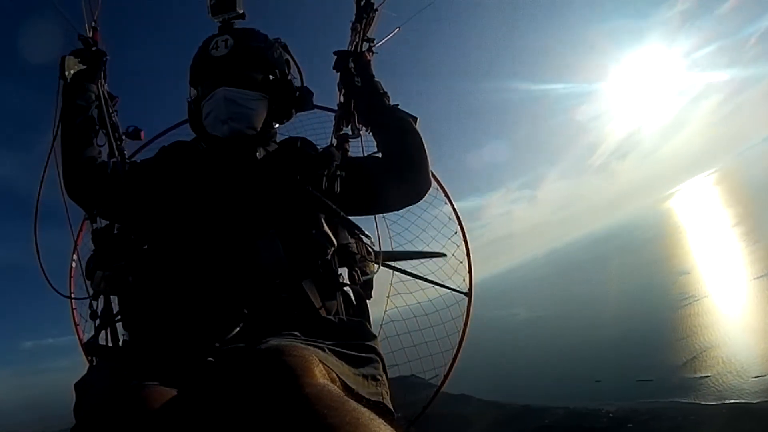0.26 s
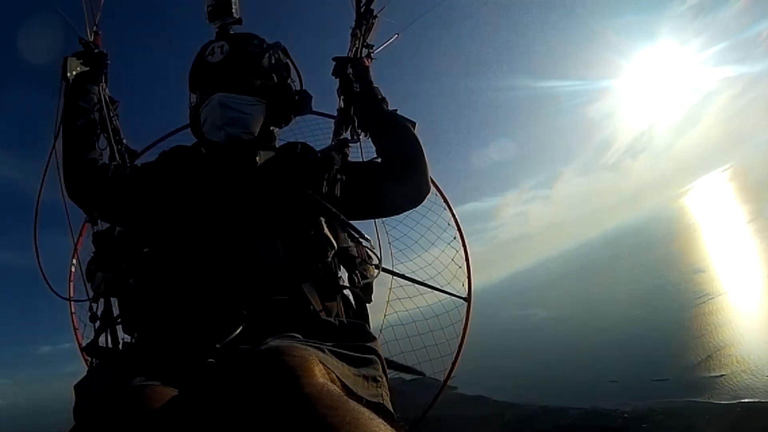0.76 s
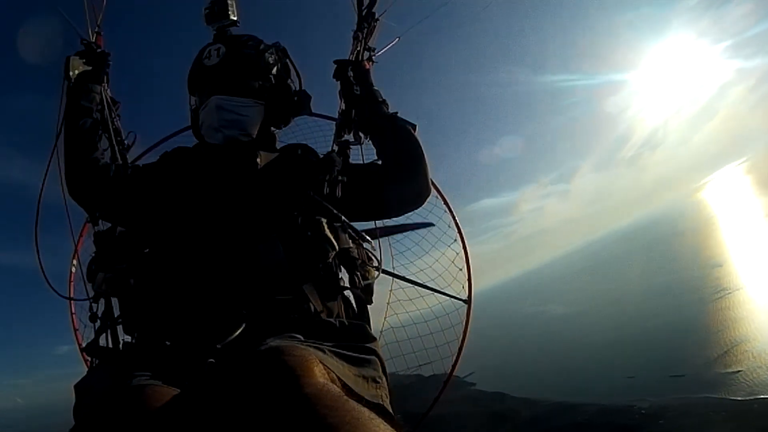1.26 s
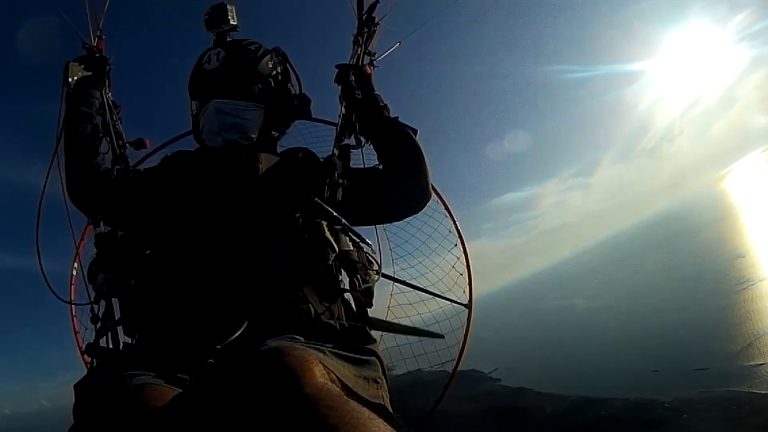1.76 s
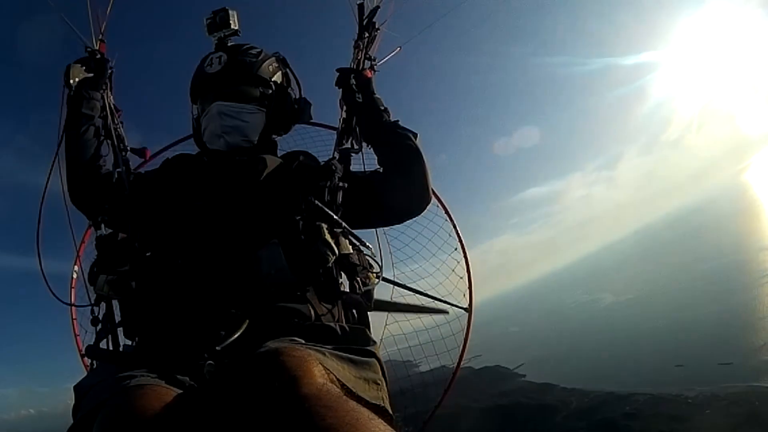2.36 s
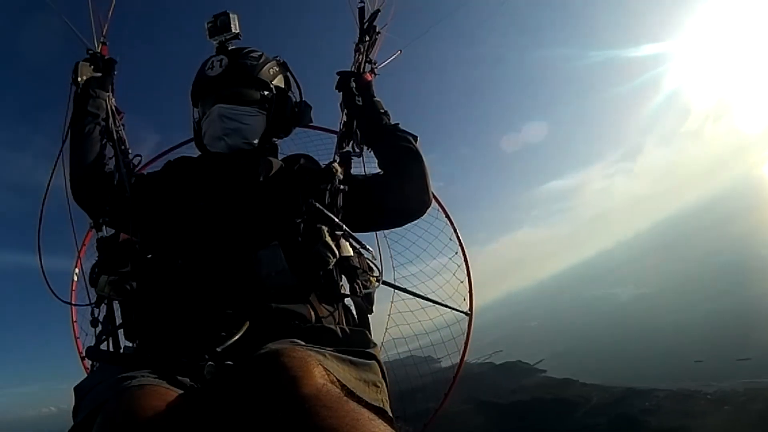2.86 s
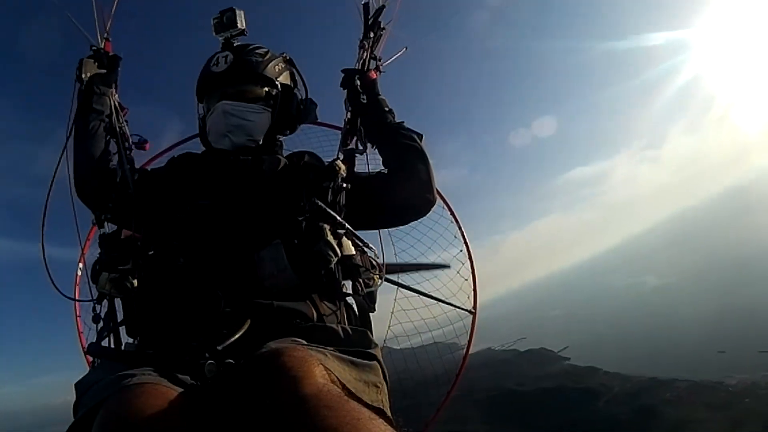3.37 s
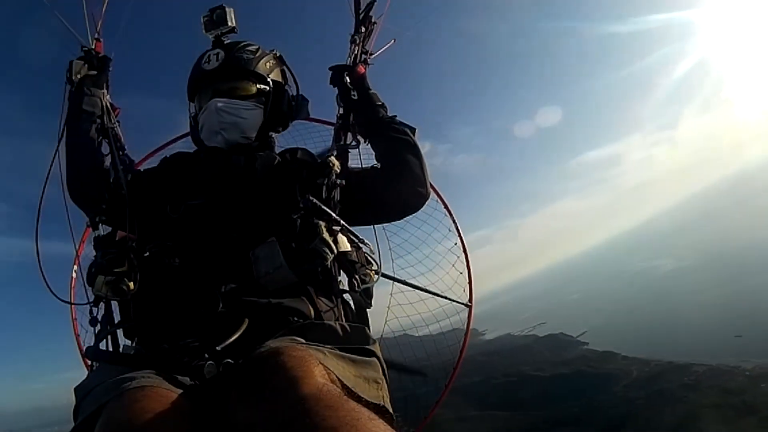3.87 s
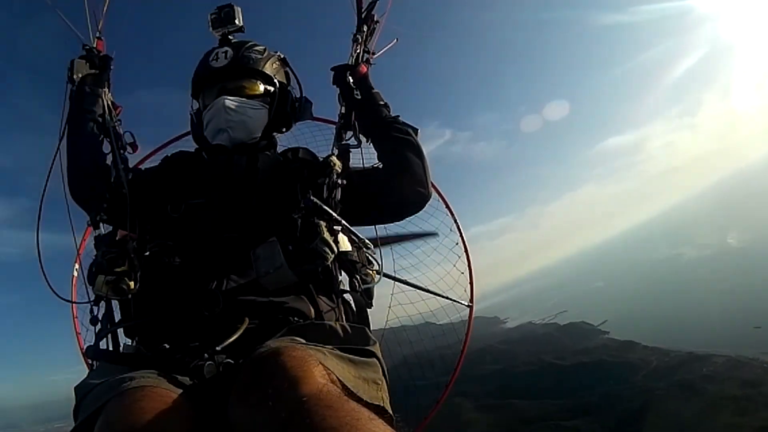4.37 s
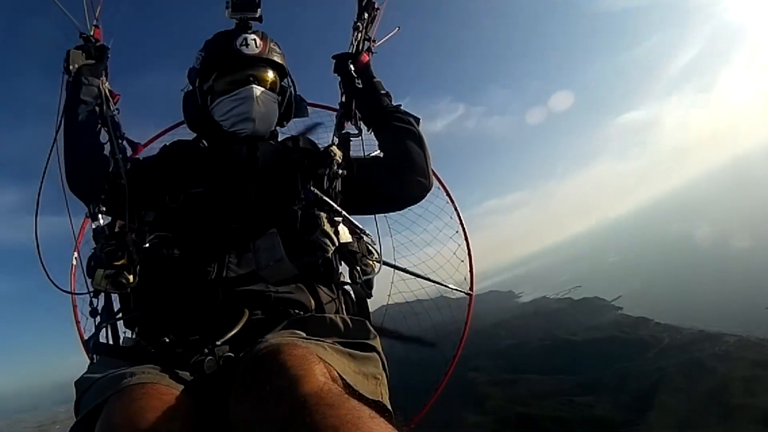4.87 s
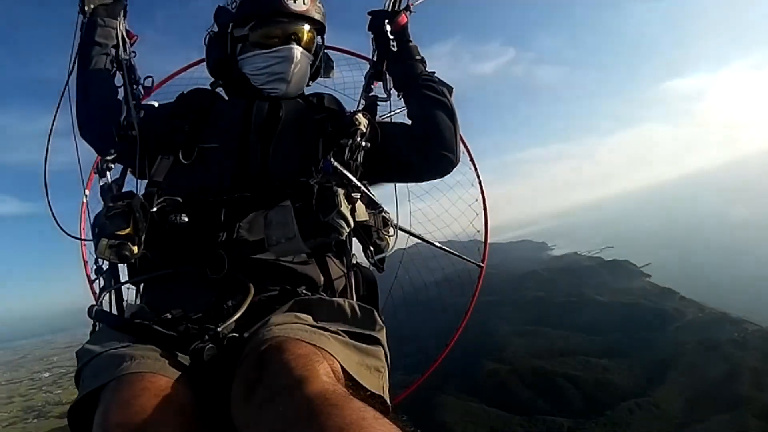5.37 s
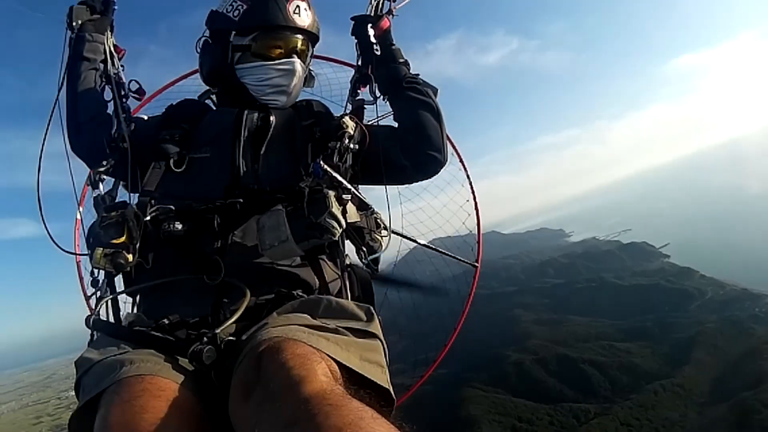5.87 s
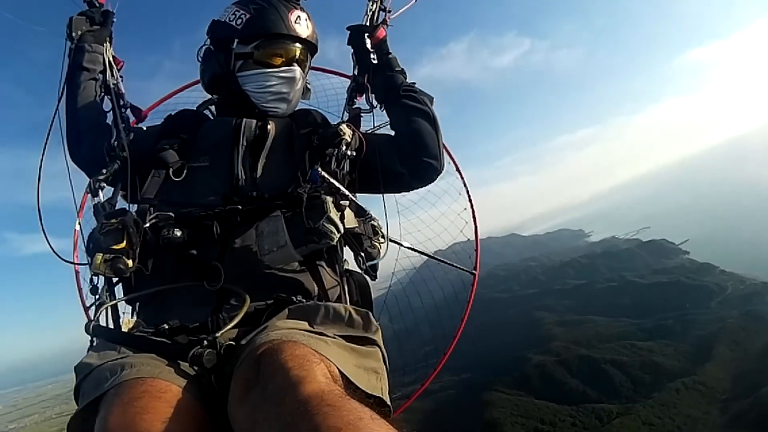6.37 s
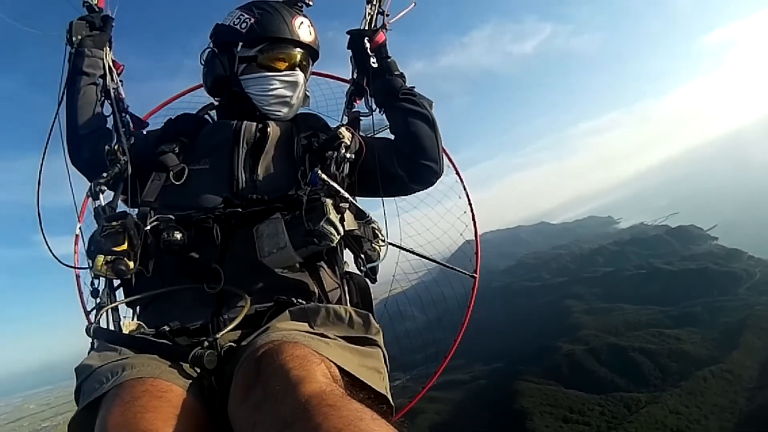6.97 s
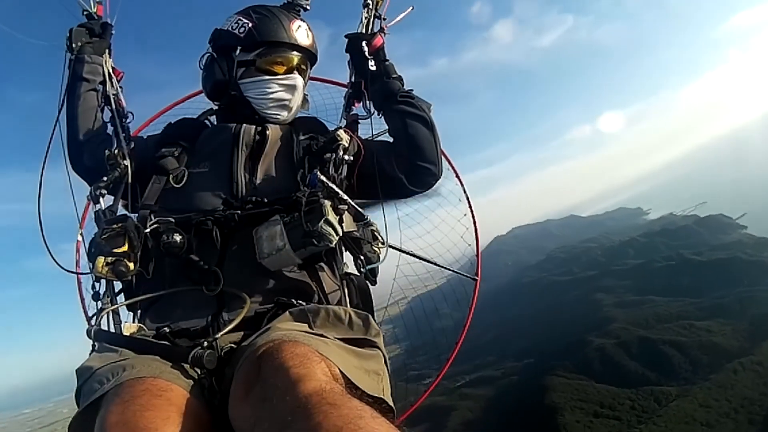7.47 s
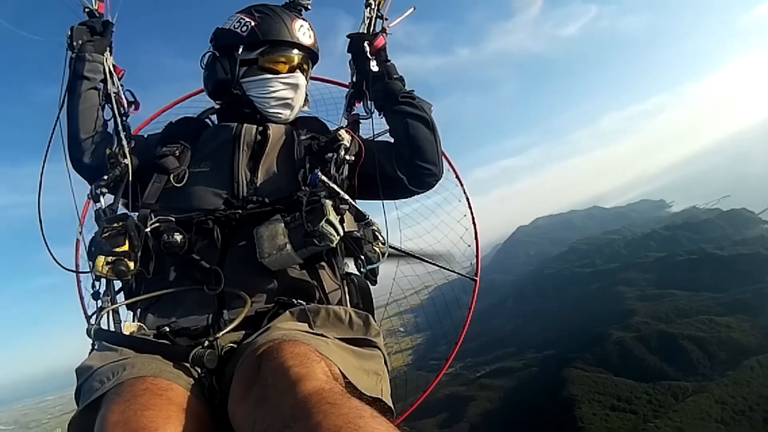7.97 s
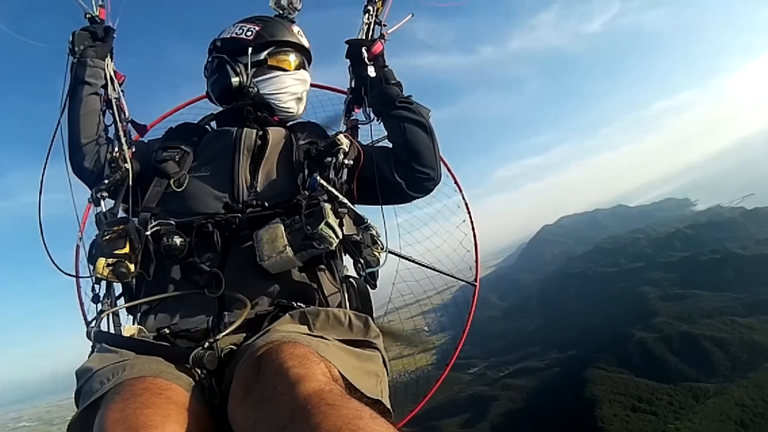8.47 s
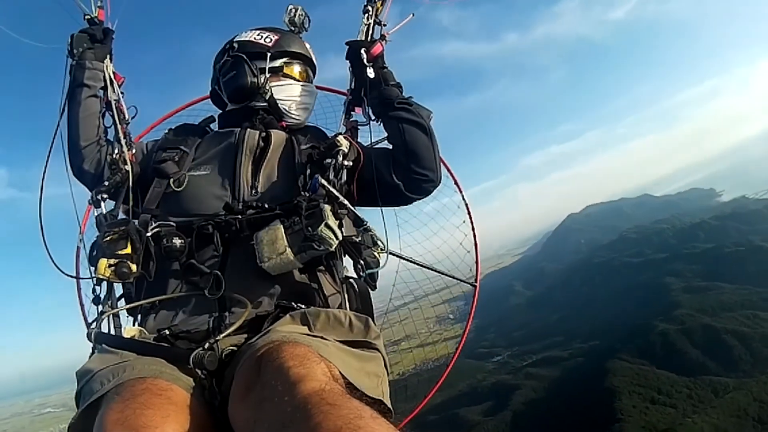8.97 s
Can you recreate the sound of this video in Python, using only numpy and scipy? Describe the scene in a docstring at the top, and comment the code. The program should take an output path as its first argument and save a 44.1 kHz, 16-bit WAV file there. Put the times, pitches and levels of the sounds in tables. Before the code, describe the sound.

A paramotor's small two-stroke engine and propeller drone at one steady pitch, a rough buzzing snarl with fast bright blade swish and soft low wind.

```python
"""Paramotor in cruise

Steady throttle, heard just in front of the pilot; wind and exhaust level wander slightly.
Propeller and two-stroke exhaust are two harmonic stacks, geared together, that beat against each other.
Blades chop the exhaust into sum and difference tones; slaps and noise bursts ring the cage as a swish.
Shaped noise makes propeller wash, hiss and light wind; a faint metal ring and electronic whine lie on top.
"""
import sys
import numpy as np
from scipy import signal
from scipy.fft import rfft, irfft, next_fast_len
from scipy.io import wavfile
from scipy.ndimage import uniform_filter1d

SR = 44100
rng = np.random.default_rng(int(sys.argv[2]) if len(sys.argv) > 2 else 0)


def generate_wav(signal):
    """Clip the signal to [-1, 1] and save it as 16-bit WAV at the path in sys.argv[1]."""
    frames = np.transpose(np.atleast_2d(signal))
    scaled = np.clip(frames, -1, 1) * 32767
    pcm = np.round(scaled).astype(np.int16)
    wavfile.write(sys.argv[1], SR, pcm)


N = 406161

# Engine speed drift: (time [s], blade passes per second [Hz])
BLADE_RATE = [(0.0, 65.039), (0.8, 64.966), (1.4, 65.222), (2.4, 65.15), (2.8, 65.237), (4.4, 65.173),
              (5.0, 65.119), (6.0, 65.105), (7.0, 65.113), (7.4, 65.431), (7.8, 65.403), (8.6, 65.528),
              (9.2, 65.233)]
# Propeller harmonics: (multiple of blade rate, nominal rms level [dB])
BLADE_TONES = [(1, -47.6), (2, -46.5), (3, -43.9), (4, -53.5), (5, -45.5), (6, -53.6), (7, -48.4),
               (8, -55.5), (9, -41.7), (10, -45.7), (11, -47.0), (12, -49.8), (13, -44.5), (14, -43.4),
               (15, -42.9), (16, -55.8), (17, -46.8), (18, -42.8), (19, -43.2), (20, -49.6), (21, -44.3),
               (22, -39.8), (23, -35.8), (24, -41.7), (25, -47.6), (26, -42.3), (27, -50.5), (28, -49.8),
               (29, -45.8), (30, -53.7)]
# Exhaust harmonics: (multiple of firing rate, nominal rms level [dB])
EXHAUST_TONES = [(1, -44.1), (2, -52.9), (3, -46.1), (4, -53.1), (5, -42.9), (6, -62.4), (7, -53.4),
                 (8, -58.0), (9, -52.1), (10, -51.5), (11, -41.4), (12, -37.5), (13, -39.4), (14, -52.5),
                 (15, -46.8), (16, -46.0)]
# Blade-chopped exhaust: (multiple of firing rate, added multiple of blade rate, nominal rms level [dB])
CHOPPED_TONES = [(1, 2, -46.4), (1, 3, -47.7), (2, 1, -40.2), (2, 2, -48.6), (3, -1, -52.0), (4, 1, -47.9),
                 (4, 3, -50.2), (5, 1, -46.7), (5, -1, -52.8), (8, 1, -51.4), (11, 2, -51.0),
                 (12, 1, -50.4), (13, -1, -49.1)]
# Pilot turning; the scene removes the mean: (time [s], turn [0-1])
PILOT_TURN = [(0, .25), (1.2, 0.3), (2.3, 0), (4, 0.1), (5.3, 0.2), (5.9, 1), (6.9, 0.64), (7.6, 0.72),
              (9.2, 0.3)]
# Shading of the harmonics per unit turn: (centre [Hz], Gaussian width [Hz], change [dB])
SHADING = [(65, 25, -6), (195, 30, -2), (326, 15, -7), (940, 240, 3.5), (1174, 30, 1.5), (1540, 30, -2),
           (1923, 120, 11.5)]
# Wind swell, before a common offset: (time [s], relative level [dB])
WIND_SWELL = [(0, -39.5), (2, -39.5), (3.5, -37), (5.3, -38), (6.3, -45), (8, -41), (9.2, -44)]
# Cage and housing resonances: (centre [Hz], width [Hz], relative peak [dB])
CAGE_MODES = [(1533, 149, 2), (1720, 96, -5), (1904, 205, -6.5), (2230, 92, -8), (2412, 78, -13),
              (2890, 205, -21), (3075, 103, -15.5), (3610, 117, -26), (3863, 156, -24), (4037, 154, -25.5),
              (4490, 93, -31), (4970, 350, -39)]
# Propeller wash spectrum: (frequency [Hz], relative density [dB per Hz])
WASH_SPECTRUM = [(40, -29), (110, -12.5), (230, -7.5), (450, -6), (620, -3.5), (780, -5), (1000, -3),
                 (1300, -2), (2000, -20), (2600, -18), (3300, -27), (5500, -39), (9000, -63)]
# Air hiss spectrum: (frequency [Hz], relative density [dB per Hz])
HISS_SPECTRUM = [(2500, -12), (5500, 1), (7000, 1), (7700, 2.5), (9500, -4.5), (10800, 0), (12400, -8.5),
                 (14300, -4), (15500, -11.5)]
# Camera electronics whine: (frequency [Hz], rms level [dB])
WHINE_TONES = [(11859, -86), (11908, -90), (11951, -80.5)]
# Reflections off pilot, harness and cage: (propeller delay [ms], exhaust delay [ms], gain [ratio])
ECHOES = [(4.64, 2.59, .9), (8.26, 4.78, .8), (9.85, 6.03, .7)]

CRANK_TURNS_PER_PROP_TURN = 73 / 19
TOP_HZ = 15600
TIME_S = np.arange(N) / SR


def undb(db):
    """Decibels to amplitude gain."""
    return 10 ** (np.asarray(db) / 20)


def level(x, rms_db):
    """Scale a sound to an rms level."""
    return x * undb(rms_db) / np.sqrt(np.mean(x ** 2))


def curve(rows):
    """Join (time, value) rows by straight lines."""
    times_s, values = np.transpose(rows)
    return np.interp(TIME_S, times_s, values)


def walk(rate_hz):
    """Random values at rate_hz, slewed from one to the next; rms 1."""
    hold = max(int(SR / rate_hz), 1)
    steps = np.repeat(rng.standard_normal(N // hold + 1), hold)
    return level(uniform_filter1d(steps, hold)[:N], 0)


def noise(points):
    """Noise of rms 1, coloured by (Hz, dB) points joined over log frequency."""
    hz, db = np.transpose(points)
    bins_hz = np.maximum(np.arange(N // 2 + 1) * SR / N, 1)
    gain = undb(np.interp(np.log(bins_hz), np.log(hz), db))
    return level(irfft(rfft(rng.standard_normal(N)) * gain, N), 0)


def resonate(x, modes):
    """Causal ringing through steep (Hz, width Hz, dB) resonances: the tail follows the blow."""
    size = next_fast_len(N + SR // 10)
    bins_hz = np.abs(np.fft.fftfreq(size, 1 / SR))
    power = sum(undb(db) ** 2 / (1 + ((bins_hz - hz) / width_hz) ** 2) ** 3
                for hz, width_hz, db in modes)
    log_gain = np.log(power + 1e-9) / 2
    response = np.exp(np.conj(signal.hilbert(log_gain)))  # minimum phase
    return irfft(rfft(x, size) * response[:size // 2 + 1], size)[:N]


def clicks(cycles):
    """One click per cycle, shared between neighbouring samples; rms 1."""
    distance = np.abs((cycles + .5) % 1 - .5)
    return level(np.maximum(1 - distance / np.gradient(cycles), 0), 0)


def smear(x, delay_ms, share):
    """All-pass echo: spreads a click in time, keeps its colour."""
    taps = np.r_[share, np.zeros(int(delay_ms * SR / 1000)), 1]
    return signal.lfilter(taps, taps[::-1], x)


def tone(cycles, rms_db):
    """Pure tone of a given rms level."""
    return np.sqrt(2) * undb(rms_db) * np.cos(2 * np.pi * cycles)


def stack(cycles, rate_hz, tones, echoes, turn, waver_db):
    """Pulse harmonics, phase-smeared by near reflections, shaded by turn, wavering in moving air."""
    out = 0
    for order, db in tones:
        hz = order * rate_hz
        paths = 1 + sum(gain * np.exp(-2j * np.pi * hz * ms / 1000) for ms, gain in echoes)
        echo_cycles = np.angle(paths) / (2 * np.pi)  # phase only; the table sets the level
        shade_db = sum(change_db * np.exp(-((hz - centre_hz) / width_hz) ** 2)
                       for centre_hz, width_hz, change_db in SHADING)
        tone_db = db + shade_db * turn + waver_db * walk(3)
        out = out + tone(order * cycles + echo_cycles, tone_db)
    return out


def exhaust(firings, blades, rate_hz, turn, waver_db=1.34, scatter_db=1.26):
    """Uneven firing pulses; blades sweeping the outlet bend the note into sum and difference tones."""
    echoes = [(ms, gain) for _, ms, gain in ECHOES]
    note = stack(firings, rate_hz, EXHAUST_TONES, echoes, turn, waver_db)
    # moving air between outlet and blades
    drift_cycles = 0.41 + 0.11 * walk(4)
    # difference tones have opposite sign, as in pitch bending
    chopped = sum(np.sign(blade) * tone(fire * firings + blade * blades + drift_cycles, db)
                  for fire, blade, db in CHOPPED_TONES)
    return (note + chopped) * undb(scatter_db * walk(110))


def metal_ring(firings, centre_hz=14450, width_hz=300, rms_db=-80):
    """Each firing rings the engine's metal, faint and very high."""
    blows = clicks(firings) * undb(2.5 * walk(125))
    return level(resonate(blows, [(centre_hz, width_hz, 0)]), rms_db)


def propeller(blades, rate_hz, turn, waver_db=1.47, scatter_db=0.57):
    """Blade pressure pulses, their strength scattered by turbulent inflow."""
    echoes = [(ms, gain) for ms, _, gain in ECHOES]
    pulses = stack(blades, rate_hz, BLADE_TONES, echoes, turn, waver_db)
    return pulses * undb(scatter_db * walk(60))


def swish(blades, rms_db=-31.5, decay_passes=0.083, slap_gain=0.78, slap_hz=1950, slap_ms=.75,
          scatter_db=0.82):
    """A blade cuts the pilot's wake: a bright slap and a turbulence burst ring the cage."""
    envelope = 1 + np.exp(-(blades % 1) / decay_passes)
    burst = level(envelope * rng.standard_normal(N), 0)
    high_pass = signal.butter(4, slap_hz, "high", fs=SR, output="sos")
    slap = signal.sosfilt(high_pass, clicks(blades))
    # arrives from the whole blade length
    slap = smear(slap, slap_ms, 0.54)
    slap = smear(slap, slap_ms / 2, 0.68)
    push = (burst + slap_gain * slap) * undb(scatter_db * walk(65))
    return level(resonate(push, CAGE_MODES), rms_db)


def wash(blades, roar_rms_db=-33.5, hiss_rms_db=-63.0, throb_db=0.1, flutter_db=0.6):
    """Slipstream noise: the roar peaks between blade passes, the hiss just after each."""
    throb = np.cos(2 * np.pi * (blades + .5))
    roar = noise(WASH_SPECTRUM) * undb(throb_db * throb + flutter_db * walk(25))
    puff = 1 + .45 * np.exp(-((blades % 1 - .08) / .08) ** 2)
    hiss = noise(HISS_SPECTRUM) * puff
    return level(roar, roar_rms_db) + level(hiss, hiss_rms_db)


def wind(offset_db=-4, gust_db=1.5, gust_rate_hz=6):
    """Airflow buffeting the microphone: low noise with a slow swell and small random gusts."""
    rumble = noise([(8, -21), (32, -1), (50, -1.0), (70, 1.0), (105, -3), (220, -9), (1000, -58)])
    return rumble * undb(curve(WIND_SWELL) + offset_db + gust_db * walk(gust_rate_hz))


def electronics_whine():
    """Steady pure tones from the camera electronics."""
    return sum(tone(hz * TIME_S, db) for hz, db in WHINE_TONES)


def scene(effort_db_per_hz=3):
    """Propeller and engine, locked through the gear, in moving air."""
    blade_hz = curve(BLADE_RATE)
    mean_blade_hz = np.mean(blade_hz)
    firings_per_pass = CRANK_TURNS_PER_PROP_TURN / 2  # two blades, one firing per crank turn
    passes = np.cumsum(blade_hz) / SR
    # start phase and jitter, in cycles
    blades = passes - .483 + .0016 * walk(40)
    firings = passes * firings_per_pass + .501 + .004 * walk(50)
    turn = curve(PILOT_TURN)
    turn = turn - np.mean(turn)
    # exhaust is louder at higher speed
    effort = undb(effort_db_per_hz * (blade_hz - mean_blade_hz))
    engine = effort * exhaust(firings, blades, mean_blade_hz * firings_per_pass, turn)
    engine = engine + metal_ring(firings)
    air = propeller(blades, mean_blade_hz, turn) + swish(blades) + wash(blades) + wind()
    return (engine + air + electronics_whine())[None]


def record(dry):
    """The camera cuts the top: steep elliptic low-pass."""
    low_pass = signal.ellip(10, .2, 80, TOP_HZ, fs=SR, output="sos")
    return signal.sosfilt(low_pass, dry)


dry = scene()
out = record(dry)
generate_wav(out)
```